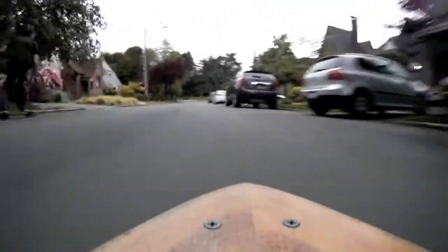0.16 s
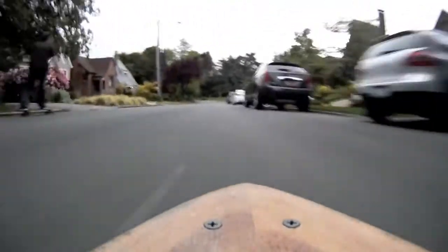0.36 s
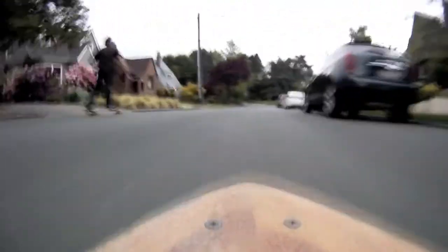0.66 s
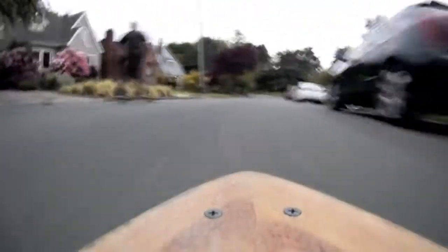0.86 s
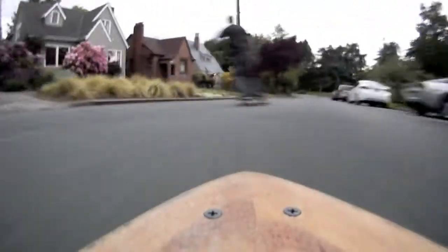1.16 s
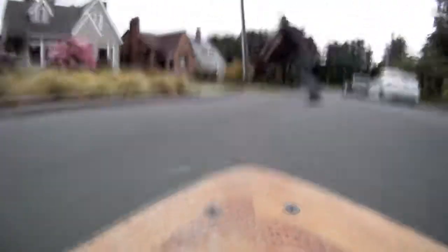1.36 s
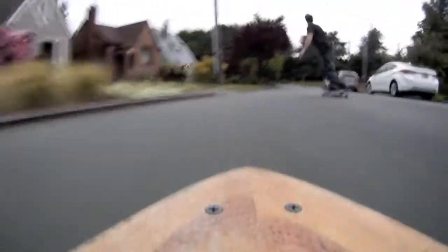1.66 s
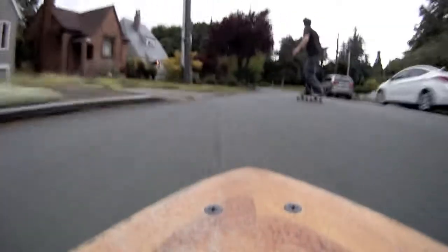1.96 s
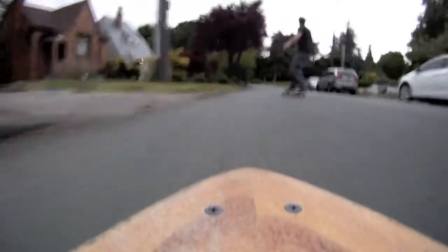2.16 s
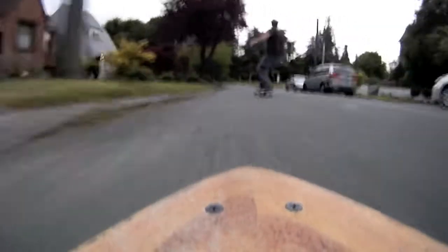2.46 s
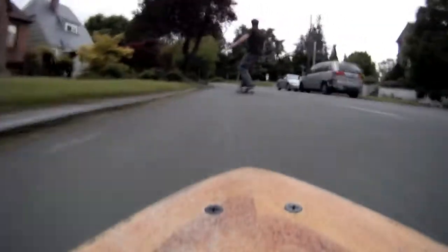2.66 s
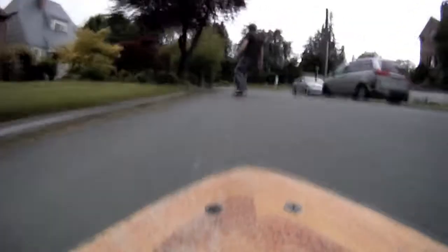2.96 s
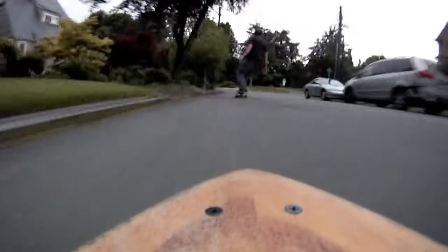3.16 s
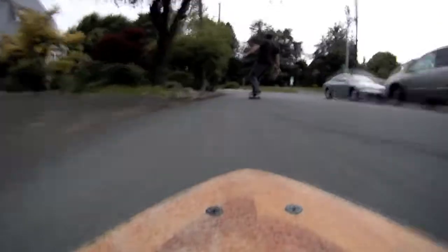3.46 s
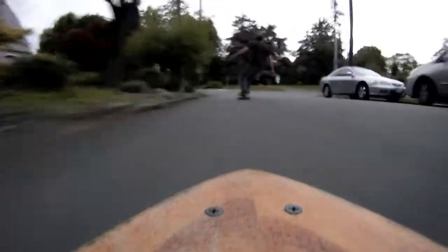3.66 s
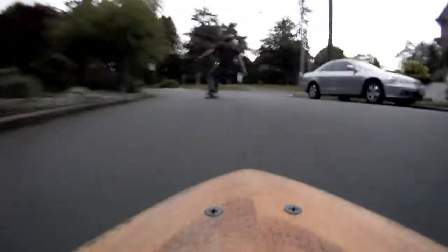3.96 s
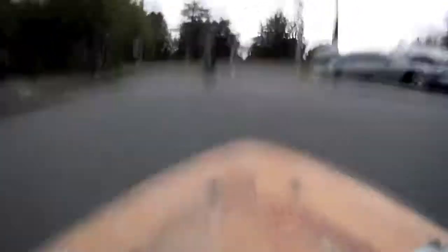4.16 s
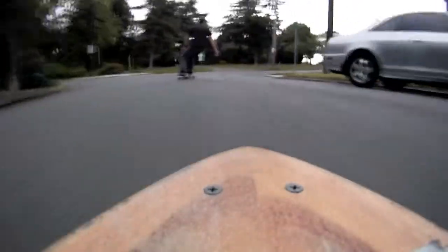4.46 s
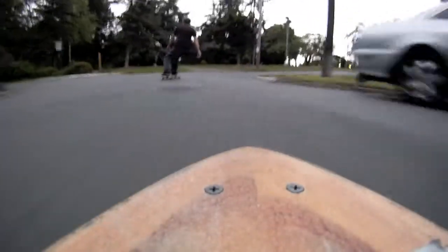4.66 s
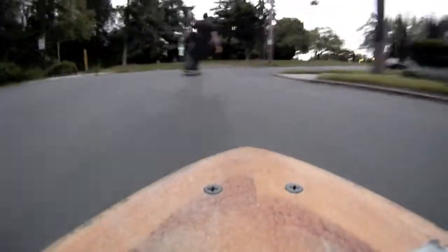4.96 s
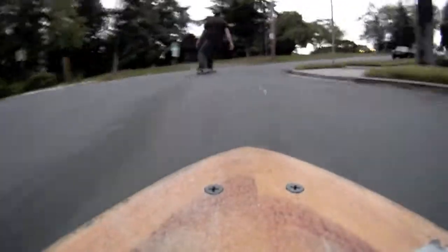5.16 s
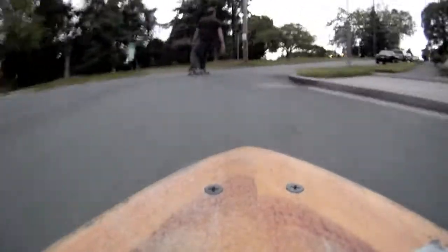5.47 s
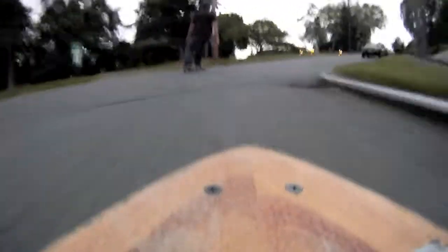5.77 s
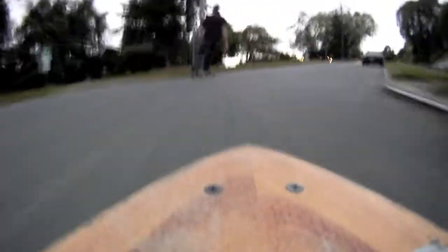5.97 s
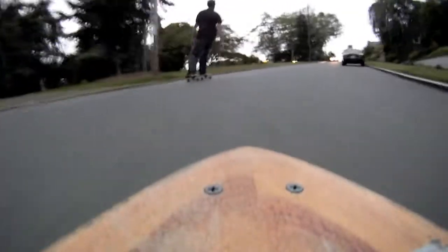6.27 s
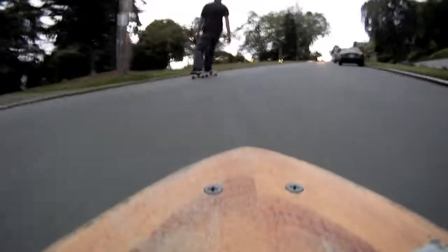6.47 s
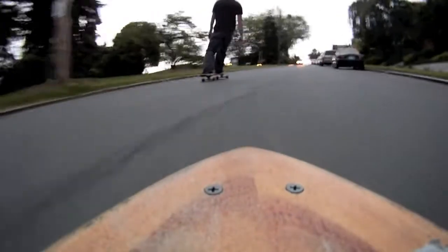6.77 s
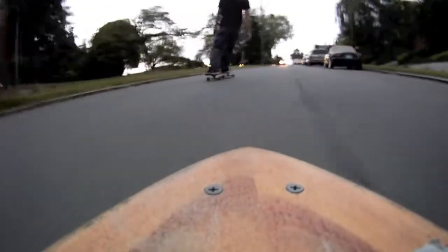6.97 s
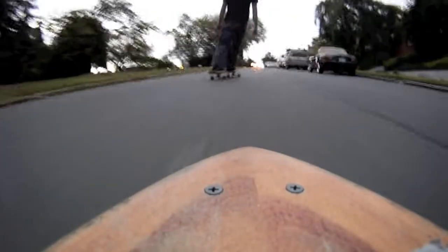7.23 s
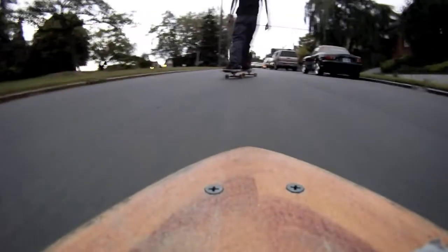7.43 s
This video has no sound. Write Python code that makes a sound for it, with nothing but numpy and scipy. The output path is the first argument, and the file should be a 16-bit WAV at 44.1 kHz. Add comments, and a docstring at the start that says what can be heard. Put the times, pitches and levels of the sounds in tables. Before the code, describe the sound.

Soft wheels speed over coarse asphalt outdoors, heard very close through the board. A mid-low woody rumble and grainy, rapid rattle run throughout, with chatter growing denser in the second half. Irregular stone clacks strike several times a second, a few much harder with dull thumps. Sound is harsh, lo-fi and saturated, with faint low buffeting.

```python
"""Longboard on rough asphalt

A longboard rolls fast down a street, heard from a small camera fixed to its deck.
Filtered noise makes the deck rumble and the mount chatter; stones and seams strike sharp knocks.
The camera saturates on the hard ones, turns its gain down after them, and samples coarsely,
which adds a glassy fizz. Air buffets below."""
import sys
import numpy as np
from scipy import signal
from scipy.fft import rfft, irfft
from scipy.io import wavfile
from scipy.ndimage import uniform_filter1d

SR = 44100
rng = np.random.default_rng(int(sys.argv[2]) if len(sys.argv) > 2 else 0)


def waveform_to_disk(signal):
    """Save audio, clipped to [-1, 1], as 16-bit WAV at the path in sys.argv[1]."""
    frames = np.transpose(np.atleast_2d(signal))
    scaled = np.clip(frames, -1, 1) * 32767
    samples = np.round(scaled).astype(np.int16)
    wavfile.write(sys.argv[1], SR, samples)


N = 335160

# Response of the wooden deck, driven through soft wheels.
# Each row: frequency in hertz, relative level in dB.
DECK_RESPONSE = [(20, -48), (45, -14.5), (90, -12), (170, -4), (290, -3), (385, 3), (480, -1), (650, -1.5),
                 (850, -10), (1300, -26), (2500, -23.5), (5500, -53.5)]
# Response of the camera mount and trucks when they are knocked.
# Each row: frequency in hertz, relative level in dB.
MOUNT_RESPONSE = [(40, -18), (250, -2), (420, -0.5), (680, 4), (880, 0.5), (1010, 1), (1130, 5.5),
                  (1340, -5.5), (1650, -4.5), (2150, 1.5), (2680, 1), (3480, -6), (3820, -1), (4500, -14),
                  (4950, -8.5), (5600, -15)]
# Course of the mount's chatter, greater on coarse asphalt.
# Each row: time in seconds, level in dB before the sources' own gains.
CHATTER_COURSE = [(0, -49), (.3, -46.5), (.5, -42.5), (.82, -50.5), (1.12, -42), (1.35, -49), (1.82, -45),
                  (1.97, -49), (2.22, -38.5), (2.9, -47), (3.35, -46.5), (3.6, -42.5), (4.45, -41.5),
                  (4.57, -47.5), (4.75, -42), (5.0, -46), (5.2, -39.5), (5.5, -40.5), (5.85, -43),
                  (6.35, -39.5), (6.58, -42), (6.85, -41), (7.6, -43.5)]


def undb(db):
    """Amplitude ratio: 20 dB is a factor of ten."""
    return 10 ** (np.asarray(db) / 20)


def unit(x):
    """Normalisation: division by the root mean square gives rms 1."""
    return x / np.sqrt(np.mean(x ** 2))


def curve(table):
    """Linear interpolation of (time, value) rows at every sample."""
    return np.interp(np.arange(N) / SR, *np.transpose(table))


def walk(rate):
    """Slow random modulation: levels held 1 / rate seconds, slewed and scaled to rms 1."""
    hold = int(SR / rate)
    steps = np.repeat(rng.standard_normal(N // hold + 1), hold)
    return unit(uniform_filter1d(steps, hold)[:N])


def body(x, points, size=2048):
    """Minimum-phase filtering: a folded cepstrum turns a spectrum into a causal ringing response."""
    hz, db = np.transpose(points)
    grid = np.maximum(np.fft.rfftfreq(size, 1 / SR), 1)
    magnitude = undb(np.interp(np.log(grid), np.log(hz), db))
    cepstrum = irfft(np.log(magnitude))
    cepstrum[1:size // 2] *= 2
    cepstrum[size // 2 + 1:] = 0
    response = irfft(np.exp(rfft(cepstrum)))[:size // 2]
    response = response / np.linalg.norm(response)  # white noise keeps its power
    return signal.fftconvolve(x, response)[:len(x)]


def boost(x, db, centre_hz, width_hz):
    """Resonance: a narrow band of x is raised or damped by a changing amount."""
    band = signal.lfilter(*signal.iirpeak(centre_hz, centre_hz / width_hz, fs=SR), x)
    return x + (undb(db) - 1) * band


def add(track, s, sound):
    """Superposition: a sound is summed into the track at time s."""
    i = max(int(s * SR), 0)
    track[i:i + len(sound)] += sound[:max(len(track) - i, 0)]


def contacts(count, spread_db):
    """Contact noise: tiny hard impacts of very unequal size, one after another."""
    sizes = undb(spread_db * rng.standard_normal(count).clip(-2, 2))
    return rng.standard_normal(count) * sizes


def air():
    """Turbulence: low-frequency pressure noise swells and fades as air buffets the camera."""
    # Spectrum of air on the microphone. Each row: frequency in hertz, relative level in dB.
    air_spectrum = [(12, 6.5), (40, -12), (90, 6), (200, -21), (700, -52)]
    # Strength of the buffeting. Each row: time in seconds, level in dB.
    air_course = [(0, -50), (.2, -44), (1.2, -64), (1.8, -55), (2.3, -64), (3.4, -74), (3.85, -47.5),
                  (4.4, -73), (4.9, -57), (7.6, -73)]
    return undb(curve(air_course)) * unit(body(rng.standard_normal(N), air_spectrum, size=8192))


def jolts(rate, jitter, spread_db):
    """Point process: energy of a train of jolts with uneven gaps and sizes, scaled to mean 1."""
    chance = rng.standard_normal((4000, 2))
    gaps = np.exp(jitter * chance[:, 0] - jitter ** 2 / 2)  # mean gap 1
    at = (np.cumsum(gaps) * SR / rate).astype(int)
    energy = undb(spread_db * chance[:, 1].clip(-2, 1.3)) ** 2
    train = np.bincount(at[at < N], energy[at < N], N)
    return train / train.mean()


def shaking(hop_hz=78, grit_db=-6, steady_db=-16, rise_s=0.00032, fall_s=0.0023):
    """Shot-noise envelope: fairly even wheel hops, with fine grit filling the gaps."""
    hops = jolts(hop_hz, jitter=.2, spread_db=5.5)
    grit = jolts(330, jitter=.8, spread_db=11.5)
    energy = hops + undb(grit_db) ** 2 * grit
    t = np.arange(1024) / SR
    burst = (1 - np.exp(-t / rise_s)) ** 2 * np.exp(-t / fall_s)
    energy = signal.fftconvolve(energy, burst / burst.sum())[:N] + undb(steady_db) ** 2
    # the rider's weight holds the mean load steady
    return np.sqrt(energy / uniform_filter1d(energy, size=4400))


def rumble(shake, follow=0.26, flutter_db=0.1, gain_db=-1.36):
    """Forced vibration: the asphalt's grain drives the deck, a little harder at each hop."""
    # Course of the rumble as the asphalt changes. Each row: time in seconds, level in dB before gain_db.
    rumble_course = [(0, -44.5), (.16, -34), (.48, -34.5), (.85, -42), (1.08, -34.5), (1.45, -41),
                     (1.78, -33.5), (2.0, -39.5), (2.25, -36), (2.6, -37.5), (2.95, -42.5), (3.48, -34.5),
                     (3.62, -38), (4.55, -41.5), (4.75, -35.5), (4.98, -37), (5.15, -35), (5.5, -41.5),
                     (5.8, -36), (6.3, -43.5), (6.8, -37.5), (7.6, -42)]
    drive = rng.standard_normal(N) * (1 + follow * (shake - 1)) * undb(flutter_db * walk(35))
    return undb(curve(rumble_course) + gain_db) * unit(body(drive, DECK_RESPONSE))


def ticks(shake, per_s=260, gain_db=-8):
    """Impulse excitation: sharp grains snap under the wheels, always pushing the same way."""
    # Response of the trucks to sharp grit. Each row: frequency in hertz, relative level in dB.
    grit_response = [(100, -21), (700, -9.5), (1500, -1), (2600, -30), (3900, 2), (5500, -4.5)]
    size = (rng.random(N) < per_s / SR) * undb(5 * rng.standard_normal(N).clip(-2, 1.5))
    return undb(gain_db) * unit(body(-size * np.minimum(shake, 1.6), grit_response))


def chatter(shake, gain_db=5.0, colour_db=1.5):
    """Modulated resonance: hops rattle the mount while the strength of its buzzing parts wanders."""
    # Small parts of the mount that buzz. Each row: frequency in hertz, bandwidth in hertz.
    buzzes = [(1550, 280), (2150, 160), (2650, 400), (3200, 1800), (3820, 1100)]
    x = body(shake * contacts(N, spread_db=3), MOUNT_RESPONSE)
    for hz, width in buzzes:
        x = boost(x, colour_db * (walk(60).clip(-2, 2) - .5), hz, width)
    return undb(gain_db) * unit(x)


def pebbles(count=150, median_gap_s=1 / 4.5, over_chatter_db=11, middle_length_s=0.0062):
    """Random impacts: small stones at uneven gaps, louder where the mount chatters more."""
    gap, stretch = rng.standard_normal((count, 2)).clip(-2, 2).T
    at = np.cumsum(np.exp(gap / 2)) * median_gap_s
    knock_db = np.interp(at, *np.transpose(CHATTER_COURSE)) + over_chatter_db
    thump_db = knock_db - 16
    return list(zip(at, knock_db, middle_length_s * 2 ** (stretch / 2), thump_db))


def knocks(gain_db=-1.5, thump_s=0.0045, thump_gain_db=2, deck_gain_db=-2, grain_db=2):
    """Impact: a stone or seam gives a dense rattle, and a soft push that sets the bent deck ringing."""
    # The biggest stones and seams. Each row: start in seconds, knock level in dB before gain_db,
    # length in seconds before its limits, thump level in dB before the thump and deck gains.
    big_stones = [(.008, -22.5, 0.0016, -53), (.2976, -26, .005, -37), (.503, -26, 0.0048, -37),
                  (.566, -29.5, .007, -46), (.6706, -23, .0075, -27.5), (.7132, -17, 0.0076, -27),
                  (.731, -22.5, 0.0028, -22), (.89, -18.5, 0.004, -44), (.938, -27.5, 0.0073, -36),
                  (1.071, -23.5, 0.017, -34), (1.141, -23.5, 0.005, -48), (1.27, -28, .0066, -44),
                  (1.3825, -9, 0.0062, -23.5), (1.8645, -18, 0.007, -43), (2.0372, -12.5, 0.0064, -24.5),
                  (2.444, -19, 0.0018, -52), (2.4768, -16, 0.0024, -39), (2.5867, -22.5, 0.0041, -49),
                  (2.7398, -19, 0.0025, -40), (2.853, -21.5, 0.005, -50), (2.907, -22, 0.0031, -52),
                  (2.999, -16.5, 0.0086, -24), (3.23, -27.5, .005, -32), (3.287, -25, 0.01, -51),
                  (3.3646, -19, 0.001, -29), (3.5056, -20.5, 0.0032, -52), (3.675, -28, 0.0031, -53),
                  (4.066, -24.5, .006, -47), (4.1834, -12, 0.01, -18), (4.485, -24, 0.0064, -48),
                  (4.7376, -30.5, .005, -45), (4.906, -28, 0.0056, -49), (4.9316, -18.5, 0.0024, -44),
                  (5.1463, -19.5, 0.0037, -38), (5.197, -31, 0.0031, -43), (5.3, -28, 0.0091, -54),
                  (5.641, -15, 0.0026, -48), (5.7848, -15.5, 0.0026, -27.5), (5.865, -27.5, 0.0056, -52),
                  (5.904, -26, 0.0052, -49), (5.9963, -17, 0.0032, -30), (6.0447, -21, 0.0047, -56),
                  (6.242, -26.5, 0.0084, -60), (6.4847, -19.5, 0.0033, -54), (6.6921, -28, 0.0039, -49),
                  (6.8702, -25, 0.0091, -40), (7.0665, -17.5, 0.0077, -49), (7.5244, -22, 0.017, -60)]
    out, pushes = np.zeros(N), np.zeros(N)
    t = np.arange(2048) / SR / thump_s  # in units of thump_s
    for s, knock_db, length, thump_db in big_stones + pebbles():
        u = np.arange(1024) / np.clip(length * SR, 40, 900)
        swell = np.sqrt(u) * np.maximum(1 - u, 0)
        rattle = body(swell * contacts(1024, spread_db=grain_db), MOUNT_RESPONSE)
        # equal energy at every length: that of 4.4 ms at rms 1
        rattle = rattle * np.sqrt(0.0044 * SR / np.sum(rattle ** 2))
        thump = -np.sin(np.pi * t) * np.exp(-1.3 * t)
        push = np.exp(-t) * rng.standard_normal(len(t))
        add(out, s, undb(knock_db + gain_db) * rattle)
        add(out, s, undb(thump_db + thump_gain_db) * thump)
        add(pushes, s, undb(thump_db + deck_gain_db) * push)
    return out + body(pushes, DECK_RESPONSE)


def wheel_note(rattles):
    """Resonant colouring: the wheels' own note strengthens and weakens within all that rattles."""
    # Strength of the note. Each row: time in seconds, boost in dB.
    ring_course = [(0, -0.5), (1.2, 0.5), (1.8, 5.5), (2.8, 0), (3.9, 5.5), (5.3, 2), (6.9, 4), (7.6, 4.5)]
    return boost(rattles, curve(ring_course), centre_hz=1000, width_hz=205)


def scene(surge_db=0.9):
    """Superposition: rumble and chatter surge together, knocks stand out, air buffets below."""
    shake = shaking()
    surge = undb(surge_db * walk(14))
    deck = surge * rumble(shake)
    mount = undb(curve(CHATTER_COURSE)) * surge * (chatter(shake) + ticks(shake))
    rattles = wheel_note(mount + knocks())
    return (deck + rattles + air())[None]


def gain_control(x, threshold_db=-25, release_db_per_s=66, attack_s=0.004, lag_s=0.013, deepest_db=10):
    """Dynamic compression: loud knocks pull the gain down a moment later; it climbs back steadily."""
    t = np.arange(N) / SR
    power = uniform_filter1d(x ** 2, size=220, origin=109)  # over the 5 ms just past
    level_db = 10 * np.log10(np.maximum(power, 1e-12))
    excess_db = np.clip(level_db - threshold_db, 0, deepest_db)
    # a running maximum on a rising ramp lets each cut decay at a constant rate
    climb = release_db_per_s * t
    cut_db = np.maximum.accumulate(excess_db + climb) - climb
    late_cut_db = np.interp(t - lag_s, t, cut_db)
    pole = np.exp(-1 / (attack_s * SR))
    return x * undb(-signal.lfilter([1 - pole], [1, -pole], late_cut_db))


def sample_and_hold(x, sampler_hz=12000, edge_hz=5450, ceiling=0.072):
    """Spectral imaging: a saturating slow converter's held steps mirror sound around its sampling rate."""
    # Top edge of the camera's sound band. Each row: frequency in hertz, gain in dB.
    band_edge = [(4600, -0.5), (4950, -3.5), (5450, -7.5), (6000, -8.5)]
    x = signal.sosfilt(signal.butter(8, edge_hz, fs=SR, output="sos"), x)
    slow = signal.resample_poly(x, 4 * sampler_hz, SR)[::4]
    slow = slow / (1 + (slow / ceiling) ** 12) ** (1 / 12)  # peaks flatten at the ceiling
    hz = np.fft.rfftfreq(len(slow), 1 / sampler_hz)
    edge_gain = undb(np.interp(hz, *np.transpose(band_edge)))
    slow = irfft(rfft(slow) * edge_gain, len(slow))
    held = np.repeat(slow, 4)
    return signal.resample_poly(held, SR, 4 * sampler_hz)[:N]


def record(dry, top_hz=15450):
    """Signal chain: the camera rides its gain, samples coarsely and low-passes the result."""
    x = sample_and_hold(gain_control(dry[0]))
    return signal.sosfilt(signal.ellip(8, .2, 70, top_hz, fs=SR, output="sos"), x)[None]


dry = scene()
out = record(dry)
waveform_to_disk(out)
```